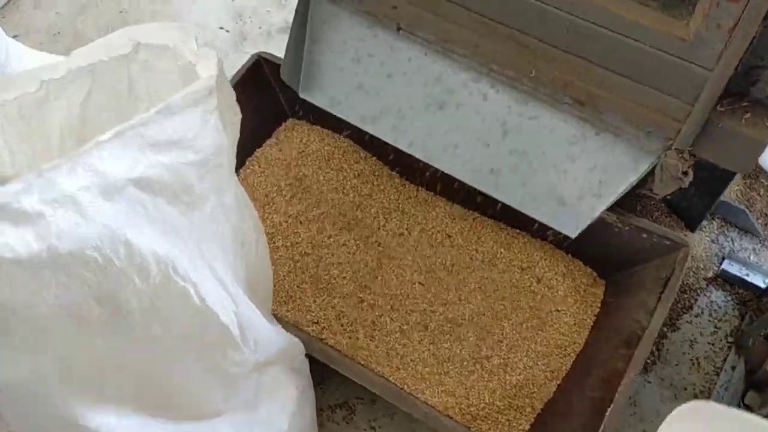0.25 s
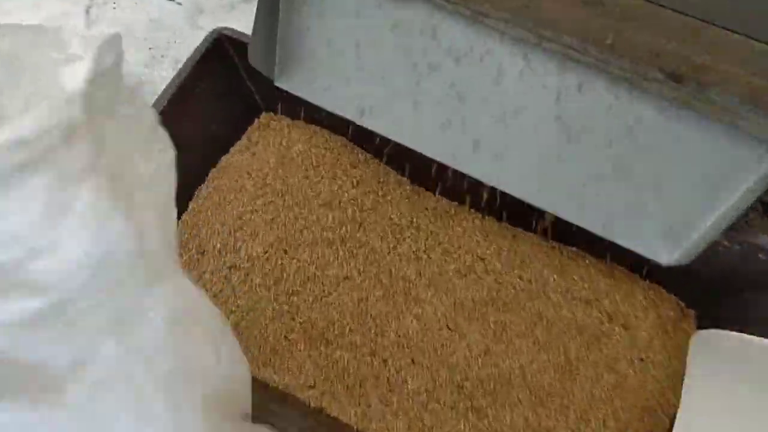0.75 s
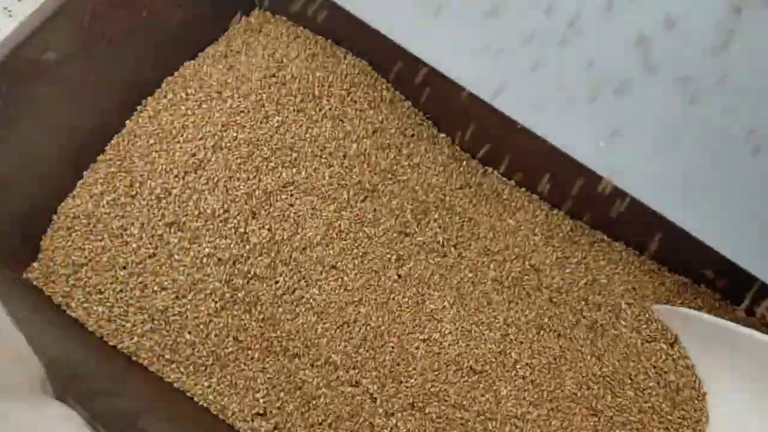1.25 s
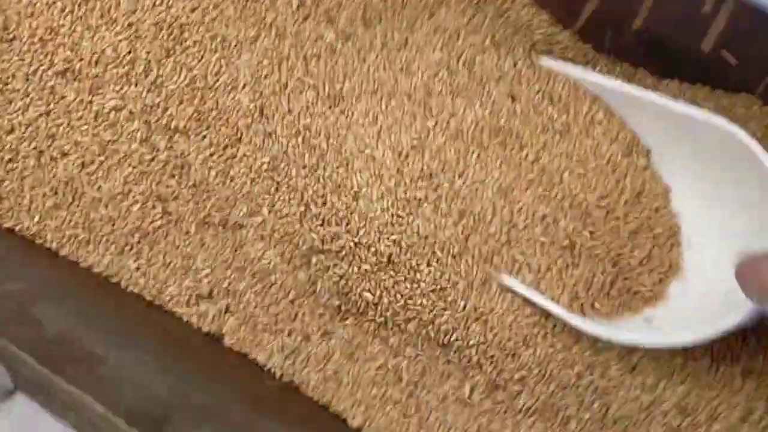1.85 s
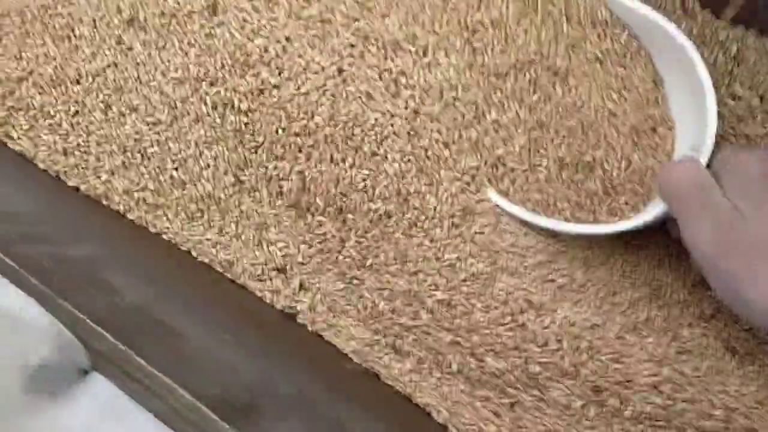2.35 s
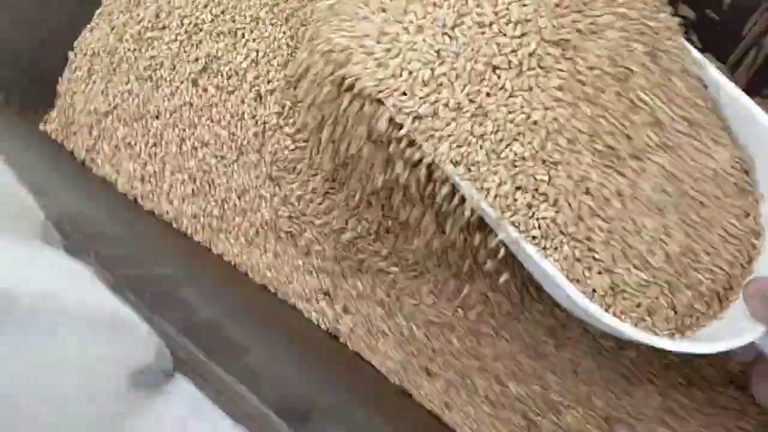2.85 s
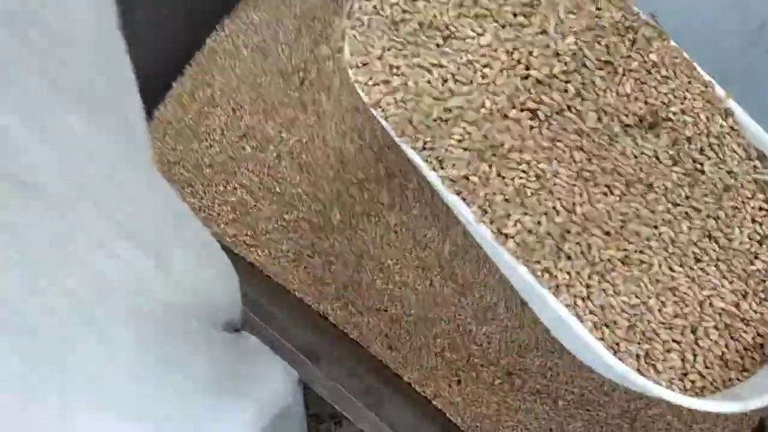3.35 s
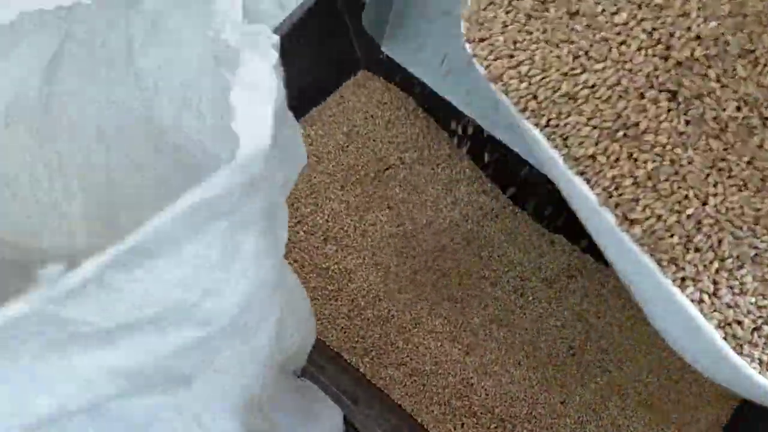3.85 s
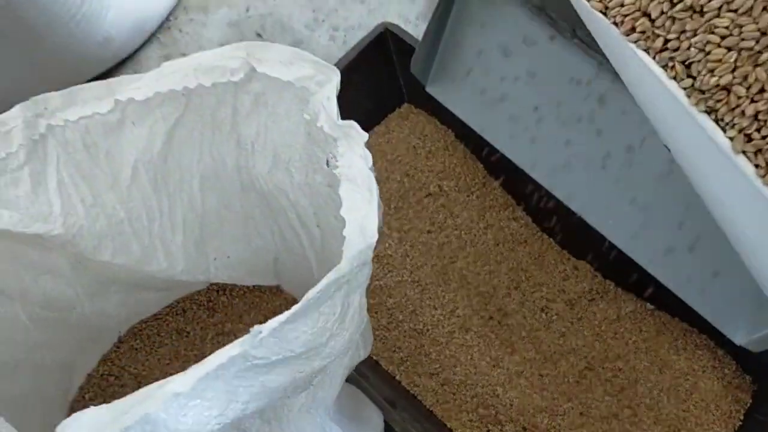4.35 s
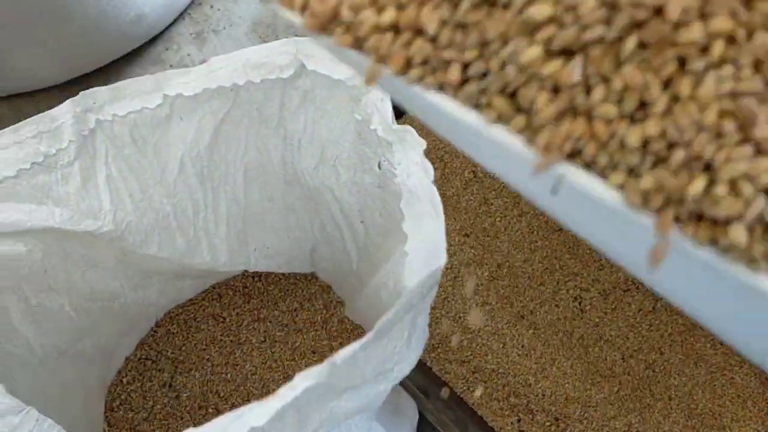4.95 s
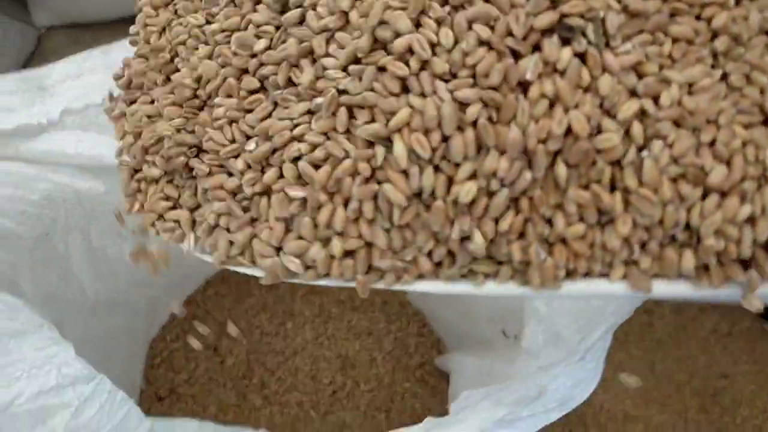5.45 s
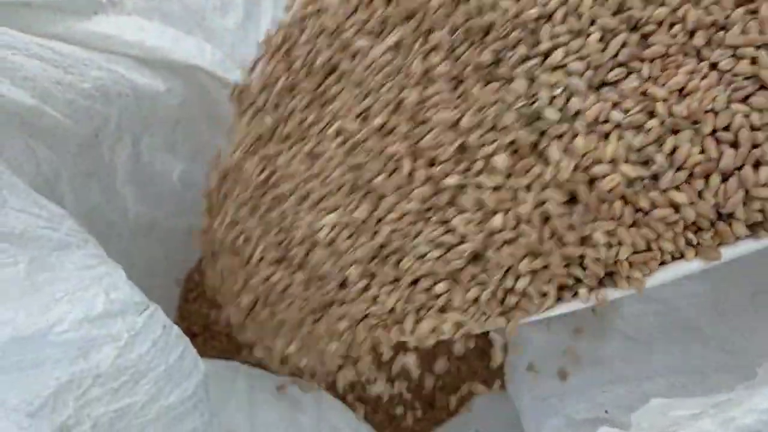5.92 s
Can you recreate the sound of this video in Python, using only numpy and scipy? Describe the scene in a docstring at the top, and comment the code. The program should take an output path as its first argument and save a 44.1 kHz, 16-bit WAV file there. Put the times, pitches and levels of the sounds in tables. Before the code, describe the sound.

Close to a grain bin in a workshop, a mill hums loudly and evenly, joined by a buzzing fan, higher wavering tones and a rasping loose panel. Kernels hiss and patter on a metal sieve in a fast, regular rhythm. The drone eases a little as a plastic scoop crunches into the grain and lifts away, with single kernels clicking. The hum then swells again, and a very faint pour begins at the end.

```python
"""A workshop, microphone beside the grain bin, leaning in and back while a mill and a sieve cleaner run.
The mill drones on one strong shaft order and a faster fan adds a wavering buzz and a rattle.
Each sieve stroke throws hissing grain over sheet metal, makes the drone throb and a loose panel rasp.
A plastic scoop digs into the bin, is lifted, and starts to pour into a sack."""
import sys
import numpy as np
from scipy import signal
from scipy.fft import rfft, irfft
from scipy.io import wavfile

SR = 44100
rng = np.random.default_rng(int(sys.argv[2]) if len(sys.argv) > 2 else 0)


def to_wav(sig):
    """Store sig (one row per channel, or 1-D mono) as 16-bit WAV at the path in sys.argv[1].

    Samples outside -1..1 are clipped; the rate is SR.
    """
    pcm = np.clip(np.atleast_2d(sig), -1, 1) * 32767
    pcm = np.round(pcm).astype(np.int16)
    wavfile.write(sys.argv[1], SR, pcm.T)  # frames by channels


N = 272538
T = np.arange(N) / SR
MILL_HZ, SIEVE_HZ, BELT_HZ = 21.9, 6.346, 2.24  # shaft turns, strokes and belt laps a second

# the machines as the microphone leans into the bin and back: time_s, drone_db, clatter_db
NEARNESS = [(0, -18, -29.5), (0.45, -15.5, -31), (1.0, -16.4, -33.5), (1.75, -20.7, -35.5), (2.3, -20, -36),
            (3.0, -19.2, -35.5), (3.65, -16.5, -34), (4.25, -14.5, -30.5), (5.35, -15, -32.5),
            (6.18, -18.5, -34.5)]


def amp(db):
    """Decibels to gain."""
    return 10 ** (np.asarray(db) / 20)


def unit(x):
    """Scales to an rms of 1."""
    return x / np.sqrt(np.mean(x ** 2) + 1e-20)


def curve(rows, column=1):
    """One column of a time table at every sample."""
    rows = np.asarray(rows)
    return np.interp(T, rows[:, 0], rows[:, column])


def colour(x, spectrum):
    """Filters by rows of frequency_hz, gain_db; the result has an rms of 1."""
    hz, db = np.transpose(spectrum)
    bins = np.fft.rfftfreq(N, 1 / SR)
    gain = amp(np.interp(np.log(bins + 1), np.log(hz), db))
    return unit(irfft(rfft(x) * gain, N))


def drift(rate_hz, size=2048):
    """A slow random wander with an rms near 1, up to about the given rate."""
    seconds = 2 * N / SR
    bins = np.arange(size // 2 + 1) / seconds
    slow = irfft(rfft(rng.standard_normal(size)) / np.sqrt(1 + (bins / rate_hz) ** 4))
    return np.interp(T, np.linspace(0, seconds, size), unit(slow))


def add(mix, start_s, sound):
    """Mixes a sound in from start_s."""
    part = mix[round(start_s * SR):][:len(sound)]
    part += sound[:len(part)]


def stroke(peak_s, order=1):
    """The swing of the sieve or an overtone of it, from -1 to 1, with a top at peak_s."""
    return np.cos(2 * np.pi * order * SIEVE_HZ * (T - peak_s))


def belt(peak_s):
    """The lap of the drive belt, from -1 to 1, with a top at peak_s."""
    return np.cos(2 * np.pi * BELT_HZ * (T - peak_s))


def panel_rasp(first_s=0.04, width_s=0.038):
    """Every stroke makes a loose panel rasp by a chance amount: short swells of level, in dB."""
    # strokes that stand out, hard or slack: peak_s, lift_db
    odd_strokes = [(1.45, 3), (1.82, -11), (1.92, 5), (2.1, 6), (2.42, 8), (3.17, 4.5), (3.53, 4),
                   (4.68, 6.5), (5.12, 5), (5.28, 0.5)]
    peaks_s = np.arange(first_s, N / SR, 1 / SIEVE_HZ)
    lifts_db = 1.34 * np.minimum(rng.exponential(1, len(peaks_s)), 2)
    swells = [*zip(peaks_s, lifts_db), *odd_strokes]
    return sum(db * np.exp(-((T - s) / width_s) ** 2) for s, db in swells)


def mill(rasp_db):
    """The eighth shaft order drones, throbs with the sieve and sways with the belt; weak orders waver."""
    # the mill's shaft orders around the drone: multiple, level_db
    weak_orders = [(2, -53), (3, -45.5), (4, -70), (5, -49), (6, -52.5), (11, -46), (13, -48), (16, -39),
                   (24, -55.5)]
    near_db = curve(NEARNESS)
    throb = stroke(peak_s=0.054) + 0.39 * stroke(peak_s=0.081, order=2)
    depth_db = 1.5 + 0.14 * (-20.5 - near_db) + 0.59 * drift(rate_hz=1.8)  # deepest where the drone is weak
    drone_db = near_db + depth_db * throb + 0.4 * belt(peak_s=0.067) + 0.53 * drift(rate_hz=6.9)
    drone_db += 0.35 * (rasp_db - rasp_db.mean())
    sway_turns = 0.035 * belt(peak_s=0.31) + 0.0055 * drift(rate_hz=16)
    out = amp(drone_db) * np.cos(2 * np.pi * (8 * MILL_HZ * T + sway_turns))
    follow_db = 0.99 * (near_db - near_db.mean())
    for order, db in weak_orders:
        turns = order * MILL_HZ * T + rng.random() + 0.015 * drift(rate_hz=3.0)
        out += amp(db + follow_db + 0.78 * drift(rate_hz=3.4)) * np.cos(2 * np.pi * turns)
    return out


def fan_turns():
    """The running count of the fan's turns; its speed wanders a little."""
    # speed of the fan shaft: time_s, speed_hz
    speed = [(0, 68.42), (2.9, 68.45), (3.3, 68.33), (6.2, 68.36)]
    return np.cumsum(curve(speed)) / SR + 0.016 * drift(rate_hz=1.42)


def shaft_tone(turns, order, flutter):
    """One shaft order of rms 1: a steady part plus a part scattered by the room."""
    scatter = 1 + flutter * (drift(rate_hz=6.4) + 1j * drift(rate_hz=6.2))
    steady = np.exp(2j * np.pi * (order * turns + rng.random()))
    return unit((scatter * steady).real)


def fan(turns, rasp_db):
    """The fast shaft buzzes; standing waves make its strongest tones swell and fade at the microphone."""
    # shaft orders of the buzz: multiple, relative_db
    buzz_orders = [(3, -12), (7, -18), (8, -11.5), (9, -12.5), (10, -17), (12, -21), (14, -20), (15, -18.5),
                   (17, -21), (18, -48), (20, -14.5), (22, -17), (25, -28), (26, -18), (27, -14),
                   (28, -12.5), (29, -14), (30, -21.5), (31, -17.5), (32, -23), (41, -21)]
    # standing-wave swells of the hum, the middle tone and the whine: time_s, relative_db
    hum_swell = [(0, -29.5), (0.45, -27), (0.75, -39), (2.6, -37.5), (3.3, -34), (4.3, -37.5), (5.6, -32.5),
                 (6.18, -37)]
    middle_swell = [(0, -41), (0.4, -34), (1.0, -54), (1.4, -41), (3.0, -39), (3.8, -51.5), (6.18, -48.5)]
    whine_swell = [(0, -44), (2.0, -52.5), (2.8, -44), (3.6, -47), (4.3, -39.5), (5.2, -40), (6.18, -49)]
    panel = amp(rasp_db - 4.0)  # the top of the buzz comes from the loose panel
    buzz = np.zeros(N)
    for order, db in buzz_orders:
        buzz += amp(db) * shaft_tone(turns, order, flutter=0.08 * order) * (panel if order > 21 else 1)
    hum = amp(2.0) * shaft_tone(turns, order=4, flutter=0.079)
    hum += shaft_tone(turns, order=5, flutter=0.12)
    hum += amp(-1.5) * shaft_tone(turns, order=6, flutter=0.16)
    middle = shaft_tone(turns, order=11, flutter=0.45)
    chatter = 0.0045 * drift(rate_hz=45)  # the panel jitters the whine's timing and makes it rough
    whine = shaft_tone(turns + chatter, order=21, flutter=0.69)
    whine *= amp(1.4 * rasp_db + 2.8 * drift(rate_hz=33))
    tones = unit(hum) * amp(curve(hum_swell) + 3) + middle * amp(curve(middle_swell))
    tones += unit(whine) * amp(curve(whine_swell) + 3)
    shake_db = 0.73 * stroke(peak_s=0.069) + 0.85 * drift(rate_hz=23)
    return buzz * amp(curve(NEARNESS, column=2)) + tones * amp(shake_db - 1.8)


def kernels(per_s, spread_db):
    """Random impacts, many small and a few large."""
    size = amp(spread_db * np.minimum(rng.exponential(1, N), 5))
    return unit(size * rng.choice([-1, 1], N) * (rng.random(N) < per_s / SR))


def ring(impacts, decay_s, wet):
    """Each impact rings briefly in modes so dense that they are a tail of noise."""
    keep = np.exp(-2 / (decay_s * SR))
    energy = signal.lfilter([1 - keep], [1, -keep], impacts ** 2)
    return unit(impacts + wet * np.sqrt(energy) * rng.standard_normal(N))


def clatter(turns, rasp_db):
    """Grain and loose panels clatter inside the machines; the higher rattle pulses as the fan turns."""
    # spectra of the low clatter and the higher rattle: frequency_hz, gain_db
    low_spectrum = [(20, -14), (55, -5.5), (90, -5.5), (140, 2), (200, -5), (240, -2.5), (380, 0.5),
                    (470, -2), (570, -5), (780, -2.5), (1000, -6), (1250, -12), (2000, -34)]
    high_spectrum = [(700, -20), (1200, -6), (1450, 5), (1620, 1), (1900, 4), (2200, -2.5), (2700, -4.5),
                     (3200, -12.5), (4000, -14.5), (5500, -30), (12000, -53)]
    beat = np.exp(0.36 * np.cos(2 * np.pi * turns) + 0.3 * np.cos(4 * np.pi * turns))
    low = ring(kernels(per_s=6000, spread_db=2.0), decay_s=0.012, wet=1.75)
    high = ring(kernels(per_s=6000 * beat, spread_db=1.0), decay_s=0.006, wet=0.99)
    shake_db = 1.22 * stroke(peak_s=0.066) + 0.29 * belt(peak_s=0.24) + 0.79 * drift(rate_hz=25)
    low = colour(low, low_spectrum) * amp(1.2 + shake_db + 0.28 * rasp_db)
    high = colour(high, high_spectrum) * amp(-5.5 + 0.55 * shake_db + 0.33 * rasp_db)
    return amp(curve(NEARNESS, column=2)) * (low + high)


def sieve():
    """Each stroke throws a shower of kernels over the metal tray; lower ticks follow as they settle."""
    # how fully the grain comes to rest between throws: time_s, share
    throw_depth = [(0, .85), (3, 0.56), (3.6, 0.94), (5, 0.9), (6.2, 0.4)]
    # the hiss, loudest with the microphone over the bin: time_s, relative_db
    hiss_level = [(0, -34.5), (1.3, -33), (1.75, -34), (2.0, -34.5), (3.2, -34), (3.7, -34.5),
                  (6.18, -35.5)]
    # spectra of the shower and of the tray under settling grain: frequency_hz, gain_db
    hiss_spectrum = [(2000, -48), (3800, -25), (5200, -32), (6900, -19.5), (8000, -11.5), (8900, -21.5),
                     (10500, -16.5), (12500, -10), (14000, -2.5), (15400, 7), (16000, -0.5)]
    tray_spectrum = [(1500, -9), (3500, 1), (5500, 0.5), (7000, 3), (7900, 8), (9000, -1.5), (14000, -18)]
    throw = (1 + stroke(peak_s=0.12)) / 2
    depth = np.clip(curve(throw_depth), 0, 1)
    flow = 1 - depth + depth * throw
    shower = ring(kernels(per_s=11000 * flow, spread_db=3.0), decay_s=0.0046, wet=1.0)
    settle_flow = 1 + 0.43 * stroke(peak_s=0.135)
    settle = ring(kernels(per_s=5000 * settle_flow, spread_db=3.0), decay_s=0.0067, wet=0.98)
    tray = colour(settle, tray_spectrum) * amp(-12)
    tray += metal_pings(per_s=3200, decay_s=0.011, spread_db=3.5) * amp(-11)
    closeness = amp(0.73 * (curve(hiss_level) + 34))  # the tray's ring carries less far than the hiss
    grain = colour(shower, hiss_spectrum) * amp(3.5) + tray * closeness
    clumps_db = 0.9 * drift(rate_hz=22)
    return grain * amp(curve(hiss_level) + 0.76 + clumps_db)


def metal_pings(per_s, decay_s, spread_db):
    """About half the kernels ring the sheet metal, mostly on the throw, at the pitch of the spot hit."""
    # resonances of the sheet: frequency_hz, gain_db
    sheet = [(2300, 5.5), (3600, 1.5), (5200, -7), (6800, -4), (7900, 3.5), (9000, -4), (13000, 1)]
    out, t = np.zeros(N), T[:SR // 16]
    chance = (1 + 0.55 * stroke(peak_s=0.118)) / 2
    fade = np.exp(-t / decay_s)
    for when, luck, spot, size in rng.random((int(per_s * N / SR), 4)):
        if luck < chance[int(when * N)]:
            pitch_hz = 2300 + 11000 * spot ** 1.3
            strength = amp(spread_db * min(-np.log(1 - size), 3))
            add(out, when * N / SR, strength * fade * np.sin(2 * np.pi * pitch_hz * t))
    return colour(out, sheet)


def floor_rumble():
    """The shaking frame rumbles through the floor, pulsing with the strokes, alike at any distance."""
    # spectrum of the rumble: frequency_hz, gain_db
    spectrum = [(20, -31), (45, -1), (64, 11), (80, -15), (110, 3), (150, -23)]
    rumble = colour(rng.standard_normal(N), spectrum)
    pulse_db = 2 * stroke(peak_s=0.079) + 0.89 * belt(peak_s=0.37) + 1.5 * drift(rate_hz=3.0)
    return rumble * amp(-48 + pulse_db)


def kernel_ticks(strays_per_s=1.6, stray_db=-33.5, spread_db=5.5):
    """A hard kernel gives a short click and rings a handful of modes; stray ones land at random."""
    # the hardest kernel strikes: start_s, peak_db
    strikes = [(0.629, -29), (1.9107, -30), (2.0649, -27.5), (2.0897, -30), (2.5262, -24.5), (2.691, -24.5),
               (2.988, -34), (3.298, -30)]
    out, t = np.zeros(N), T[:SR // 12]
    band = signal.butter(2, [2800, 9000], "bandpass", fs=SR, output="sos")
    draws = rng.random((round(strays_per_s * N / SR), 2))
    strays = [(when * N / SR, stray_db + spread_db * (2 * size - 1)) for when, size in draws]
    for start_s, peak_db in [*strikes, *strays]:
        modes_hz = 2500 * 3.4 ** (rng.random((14, 1)) ** 1.5)
        modes = np.sin(2 * np.pi * (modes_hz * t + rng.random(modes_hz.shape))).mean(axis=0)
        click = signal.sosfilt(band, rng.standard_normal(len(t)) * np.exp(-t / 0.0077))
        tick = modes * np.exp(-t / 0.029) + 0.56 * click
        add(out, start_s, amp(peak_db) * tick / abs(tick).max())
    return out


def scoop():
    """Kernels rustle against the plastic; each move of the scoop swells and dies away."""
    # the scoop digs in, pushes on, lifts out and pours: peak_s, rise_s, fall_s, level_db
    moves = [(1.905, 0.014, 0.2, -39.5), (2.35, .2, 0.13, -45.5), (2.98, 0.27, 0.022, -38),
             (6.15, .45, .2, -54)]
    # spectrum of grain on plastic: frequency_hz, gain_db
    plastic = [(300, -15), (1000, -3), (3000, -4), (6000, -8.5), (9000, -5), (15000, -13)]
    rustle = ring(kernels(per_s=2600, spread_db=4), decay_s=0.0074, wet=0.76)
    effort = np.zeros(N)
    for peak_s, rise_s, fall_s, db in moves:
        effort += amp(db) * np.exp(-np.maximum((peak_s - T) / rise_s, (T - peak_s) / fall_s))
    return colour(rustle, plastic) * effort * amp(0.34 * drift(rate_hz=9))


def scene():
    """Both machines and the scoop, in mono from beside the bin."""
    turns = fan_turns()
    rasp_db = panel_rasp()
    machines = mill(rasp_db) + fan(turns, rasp_db) + clatter(turns, rasp_db) + sieve() + floor_rumble()
    return (machines + scoop() + kernel_ticks())[None]


def record(dry):
    """The recorder's band limit cuts the top of the hiss steeply."""
    edge_hz = 15780
    lowpass = signal.firwin(1023, edge_hz, window=("kaiser", 9), fs=SR)
    return signal.oaconvolve(dry, lowpass[None], "same")


dry = scene()
out = record(dry)
to_wav(out)
```